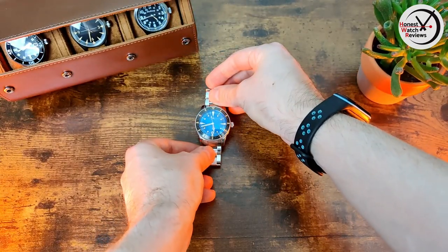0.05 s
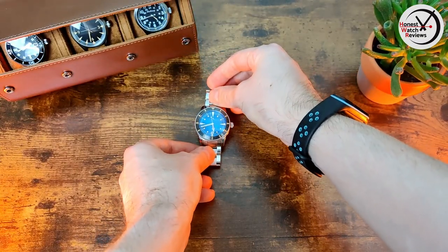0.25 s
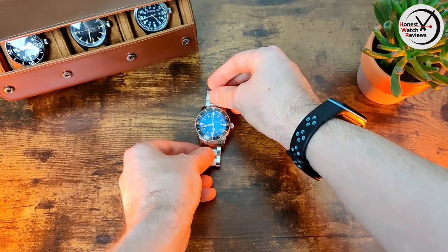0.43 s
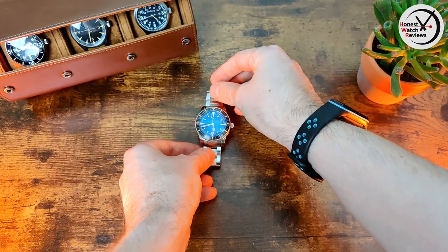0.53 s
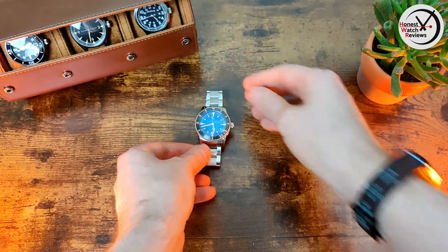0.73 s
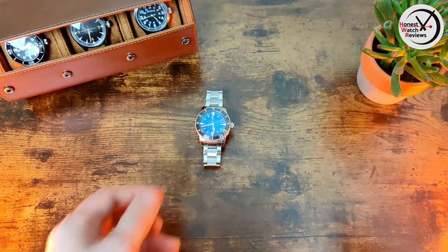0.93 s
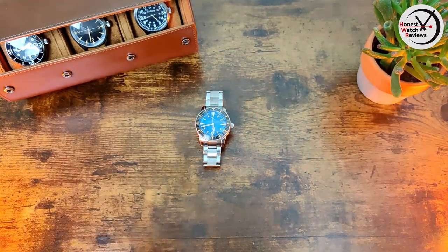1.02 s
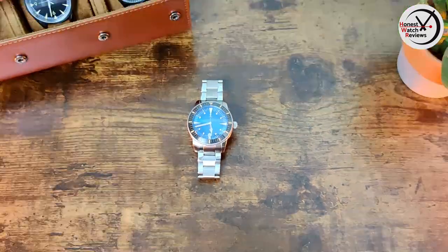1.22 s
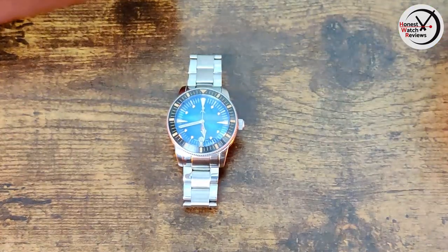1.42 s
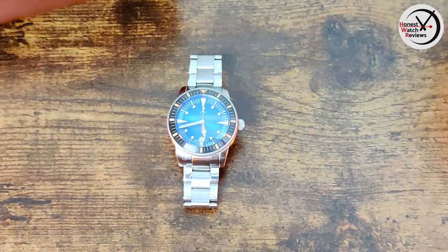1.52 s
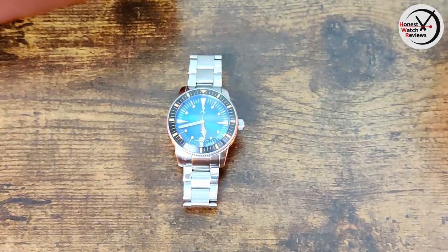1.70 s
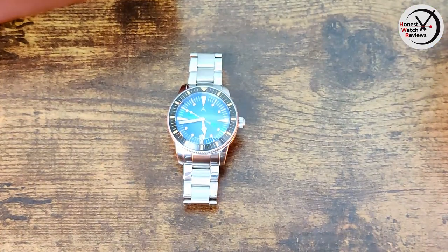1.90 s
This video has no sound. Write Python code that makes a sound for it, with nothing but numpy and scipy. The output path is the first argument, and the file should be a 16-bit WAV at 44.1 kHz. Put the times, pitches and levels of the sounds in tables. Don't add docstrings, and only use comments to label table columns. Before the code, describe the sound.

Metal bracelet links hit wood in one bright, tight clack just after a dying soft knock; a short room tail, small link ticks, barely audible cloth and skin movement, faint thumps and hiss, miked closely.

```python
import sys
import numpy as np
from scipy import signal
from scipy.fft import rfft
from scipy.io import wavfile
from scipy.ndimage import uniform_filter1d

SR = 44100
rng = np.random.default_rng(int(sys.argv[2]) if len(sys.argv) > 2 else 0)


def volts(x):
    e = np.asarray(x, float) / 20
    return 10 ** e


def master_out(mix):
    frames = np.transpose(np.atleast_2d(mix))
    ceiling = np.clip(frames, -1, 1)
    pcm = np.round(ceiling * 32767).astype(np.int16)
    wavfile.write(sys.argv[1], SR, pcm)


N = 85995
T = np.arange(N) / SR
CLACK_S = .248


def rms_one(x):
    return x / np.sqrt(np.mean(x ** 2) + 1e-20)


def in_time(rows):
    s, *columns = np.transpose(rows)
    return [np.interp(T, s, column) for column in columns]


def at_hz(points, hz):
    point_hz, value = np.transpose(points)
    return np.interp(np.log(hz), np.log(point_hz), value)


def drift(rate):
    step = 40
    pole = np.exp(-2 * np.pi * step * rate / SR)
    white = rng.standard_normal(N // step + 2002)
    slow = signal.lfilter([1], [1, -2 * pole, pole * pole], white)[2000:]
    return np.interp(np.arange(N) / step, np.arange(len(slow)), rms_one(slow))


def ring(clicks, hz, t60):
    pole = volts(-60 / (t60 * SR))
    w = 2 * np.pi * min(hz, .45 * SR) / SR
    return signal.lfilter([0, np.sin(w)], [1, -2 * pole * np.cos(w), pole * pole], clicks + 1e-18)


def resonances(rows):
    white = rng.standard_normal(N)
    out = 0
    for hz, width, db in rows:
        t60 = np.log(1000) / np.pi / width
        out = out + volts(db) * rms_one(ring(white, hz, t60))
    return out


def strikes(rows, modes, spread_db):
    s, db = np.transpose(rows)
    draws = rng.standard_normal((len(s), 2 * len(modes)))
    out = 0
    for k, (hz, level_db, t60) in enumerate(modes):
        strength, sign = draws[:, 2 * k], np.sign(draws[:, 2 * k + 1])
        clicks = np.zeros(N)
        clicks[(s * SR).astype(int)] = volts(db + level_db + spread_db * strength) * sign
        out = out + ring(clicks, hz, t60)
    return out


# (frequency [Hz], t60 [s])
ROOM_DECAY = [(60, .4), (250, .28), (700, 0.25), (2000, 0.22), (4500, .19), (8000, 0.17), (15000, .16)]


def noise(spectrum, patchy_db, start=None):
    out, power = 0, 0
    edges = 22 * 2 ** np.arange(0, 9.7, 1 / 3)
    white = rng.standard_normal((2, N))
    for k, (low, high) in enumerate(zip(edges, edges[1:])):
        band_pass = signal.butter(2, [low, high], "band", fs=SR, output="sos")
        band = signal.sosfilt(band_pass, white[k % 2])
        hz = np.sqrt(low * high)
        level_db = at_hz(spectrum, hz)
        power += volts(2 * level_db) * 2 * (high - low) / SR
        gain_db = level_db + patchy_db * drift(15)
        if start is not None:
            gain_db = gain_db - 60 * np.maximum(T - start, 0) / at_hz(ROOM_DECAY, hz)
        out = out + volts(gain_db) * band
    return out / np.sqrt(power)


# (time [s], peak level [dB])
LINK_STRIKES = [(.2460, -32), (.2469, -30), (.2478, -19), (.2484, -17), (.2491, -11), (.2500, -17),
                (.2510, -17), (.2526, -20), (.2546, -23), (.2575, -25), (.2595, -26)]
# (frequency [Hz], level [dB], t60 [s])
LINK_MODES = [(2224, -15.5, 0.0045), (3250, -13.5, .006), (4610, -6, 0.0058), (6417, -0.5, 0.003),
              (9197, -9.5, .003), (11070, -15, .003), (15000, -12.5, 0.0025)]
# (frequency [Hz], level [dB], t60 [s])
BODY_MODES = [(50, -19.5, 0.23), (161.1, -26.5, 0.3), (259.9, -25.5, .2), (323.8, -26.5, .2),
              (525.4, -18.5, .2), (782, -17.5, 0.12), (1031, -25, .15), (1660, -23.5, .18),
              (1768, -21.5, 0.13), (2000, -24, .2), (2215, -18.5, 0.12), (2736, -21, .13), (3926, -20, .14),
              (4350, -24, 0.23)]
# (frequency [Hz], density [dB per Hz])
CLACK_ROOM_TONE = [(60, -24), (150, -11), (600, -9.5), (1300, -10), (2200, -6.5), (4300, -1.5), (8000, -9),
                   (15800, -27)]


def clack():
    room_db, build_s, body_spread_s = -26, .002, .004
    rise = 1 - np.exp(-np.maximum(T - CLACK_S, 0) / build_s)
    room = volts(room_db) * rise * noise(CLACK_ROOM_TONE, 2.5, CLACK_S)
    body = 0
    for mode in BODY_MODES:
        wake_s = CLACK_S + body_spread_s * rng.random()
        body = body + strikes([(wake_s, -14)], [mode], 0)
    return strikes(LINK_STRIKES, LINK_MODES, spread_db=0.5) + body + room


# (frequency [Hz], level [dB], t60 [s])
KNOCK_MODES = [(45, -54.5, .3), (144, -52, .25), (272, -48.5, .2), (2120, -53, 0.052)]
# (frequency [Hz], density [dB per Hz])
KNOCK_ROOM_TONE = [(30, -3.5), (294, -4), (645, -7), (2270, -10.5), (4300, -13.5), (5700, -30),
                   (8600, -27.5), (15800, -34)]


def knock():
    room_db = -51
    modes = 0
    for hz, db, t60 in KNOCK_MODES:
        modes = modes + volts(db - 60 * T / t60) * np.cos(2 * np.pi * (hz * T + rng.random()))
    return modes + volts(room_db) * noise(KNOCK_ROOM_TONE, 1.3, 0)


# (time [s], frequency [Hz], level [dB])
ROTOR = [(.008, 8030, -85), (.016, 8025, -71), (.045, 7940, -74), (.075, 7640, -76), (.1, 7250, -73),
         (.125, 7170, -71), (.16, 7530, -75), (.197, 7730, -75), (.243, 6980, -69)]
# (multiple [ratio], level [dB], extra level [dB per 100 Hz of speed])
ROTOR_PARTIALS = [(1, 0, 0.0), (.957, -12, -.3), (.915, -13, -.3), (1.295, -13, 1.8), (1.505, -8, 1.8),
                  (1.63, -17, 2.1)]
# (frequency [Hz], width [Hz], level [dB])
ROTOR_CASE = [(1900, 130, -76.5), (3482, 50, -83.5), (1600, 60, -81.5), (500, 40, -72)]


def whir():
    mean_hz, wobble, flicker_db = 7600, 0.0018, 3.5
    hz, db = in_time(ROTOR)
    hz = uniform_filter1d(hz, size=900)
    turns = np.cumsum(hz * (1 + wobble * drift(60))) / SR
    partials = 0
    for multiple, level_db, slope in ROTOR_PARTIALS:
        partial_db = level_db + slope * (hz - mean_hz) / 100 + flicker_db * drift(25)
        partials = partials + volts(partial_db) * np.sin(2 * np.pi * multiple * turns)
    rotor = np.sqrt(2) * volts(db) * partials * (T > ROTOR[0][0])
    return (rotor + resonances(ROTOR_CASE)) * (T < CLACK_S)


# (time [s], peak level [dB], frequency [Hz])
LINK_TICKS = [(.215, -71, 3460), (.222, -59.5, 2000), (.453, -59, 6080), (.456, -60.5, 3100),
              (.385, -57, 6100), (1.06, -65, 7100)]


def ticks():
    ring_t60, overtone_t60, puff_t60, room_db = .012, 0.0031, .08, -13.5
    out, white = 0, rng.standard_normal(N)
    for s, db, hz in LINK_TICKS:
        age = np.maximum(T - s, 0)
        puff = volts(room_db - 60 * age / puff_t60) * (age > 0) * white * 0.1
        puff[int(s * SR)] = 1
        tick = ring(puff, hz, ring_t60) + .5 * ring(puff, hz * 1.9, overtone_t60)
        out = out + volts(db) * tick
    return out


# (time [s], level [dB])
HAND_SLIDE = [(.05, -71), (.2, -75.5), (.24, -49.5), (.45, -81.5), (.7, -81), (.8, -79), (.95, -74.5),
              (1.05, -84), (1.6, -83.5), (1.95, -79)]
# (frequency [Hz], density [dB per Hz])
SKIN_TONE = [(70, -26), (130, 1), (215, -11.5), (500, -9), (900, -14), (2500, -23), (3300, -44.5)]
# (frequency [Hz], width [Hz], level [dB])
WOOD_HUM = [(347, 38, -7.5), (465, 43, -4)]


def slide():
    level_db, = in_time(HAND_SLIDE)
    return volts(level_db) * (noise(SKIN_TONE, 2.5) + resonances(WOOD_HUM))


# (time [s], level [dB])
SLEEVE_MOVES = [(.06, -89), (.212, -78), (.2155, -67), (.24, -70.5), (.45, -79), (.65, -87), (.8, -80.5),
                (.93, -77), (.97, -75), (1.055, -70), (1.075, -85.5), (1.6, -86.5), (1.85, -88.5),
                (1.95, -80.5)]
# (frequency [Hz], density [dB per Hz])
CLOTH_TONE = [(120, -40.5), (200, -4), (447, -1.5), (879, -9), (946, -16.5), (3800, -5.5), (5180, -11),
              (15800, -11)]


def sleeves():
    level_db, = in_time(SLEEVE_MOVES)
    return volts(level_db) * noise(CLOTH_TONE, 1.9)


# (time [s], peak level [dB], frequency [Hz])
TABLE_THUMPS = [(.21, -64, 50), (0.326, -40.5, 45), (.40, -61, 45), (.47, -62, 45), (0.521, -68, 45),
                (0.689, -61, 45), (.76, -69, 50), (.875, -56.5, 42.6), (0.903, -55, 48), (.945, -58.5, 68),
                (1.019, -57, 30.3), (1.069, -62.5, 118), (1.079, -58, 37.3), (1.165, -54.5, 37.8),
                (1.209, -74, 45), (1.264, -59.5, 45), (1.352, -60, 45), (1.489, -64, 45),
                (1.541, -68.5, 45), (1.591, -61, 60), (1.835, -63, 36), (1.925, -54.5, 45)]


def thumps():
    swell_cycles = 0.58
    out = 0
    for s, db, hz in TABLE_THUMPS:
        cycles = (T - s) * hz
        swell = np.exp(-(cycles / swell_cycles) ** 2)
        out = out + volts(db) * swell * np.cos(2 * np.pi * (cycles + rng.random()))
    return out


# (frequency [Hz], density [dB per Hz])
HISS_TONE = [(15, -36), (25, 3.5), (96, -14), (261, -19.5), (449, -23.5), (857, -27), (1510, -26.5),
             (5520, -40), (15800, -28)]


def hiss():
    return volts(-73.5) * noise(HISS_TONE, 1.1)


def scene():
    cloth = sleeves()
    watch = clack() + knock() + ticks() + whir()
    table = thumps() + slide()
    return (cloth + watch + table + hiss())[None]


def bridge(x, s, count):
    level_db, length_s, size = -2, .012, 512
    end = int(s * SR) - 200
    height = np.abs(rfft(x[end - size:end] * np.hanning(size))) / (size / 4)
    tops = signal.argrelmax(height[8:170])[0] + 8
    prominence = height / uniform_filter1d(height, size=25)
    tops = tops[np.argsort(prominence[tops])[-count:]]
    tones = sum(height[k] * np.sin(2 * np.pi * (k * SR / size * T + rng.random())) for k in tops)
    return volts(level_db) * tones * np.exp(-((T - s) / length_s) ** 4)


# (time [s], length [s], level [dB])
GAPS = [(.239, .005, -14), (.33, .006, -12), (.648, .008, -18), (.947, .005, -16), (1.077, .006, -20),
        (1.25, .008, -18), (1.5, .007, -16)]


def starve(dry):
    low_hz, high_hz = 500, 14600
    gap_db = sum(db * np.exp(-((T - s) / length) ** 2) for s, length, db in GAPS)
    band_pass = signal.butter(3, [low_hz, high_hz], "band", fs=SR, output="sos")
    band = signal.sosfiltfilt(band_pass, dry)
    bridges = sum(bridge(dry[0], s, count=8) for s, _, _ in GAPS)
    return dry - (1 - volts(gap_db)) * band + bridges


def roll_off(x):
    return signal.sosfilt(signal.butter(12, 16510, fs=SR, output="sos"), x)


def record(dry):
    top_cut = signal.cheby2(12, 40, 16200, fs=SR, output="sos")
    mix = signal.sosfilt(top_cut, starve(dry))
    return roll_off(mix)


dry = scene()
out = record(dry)
master_out(out)
```